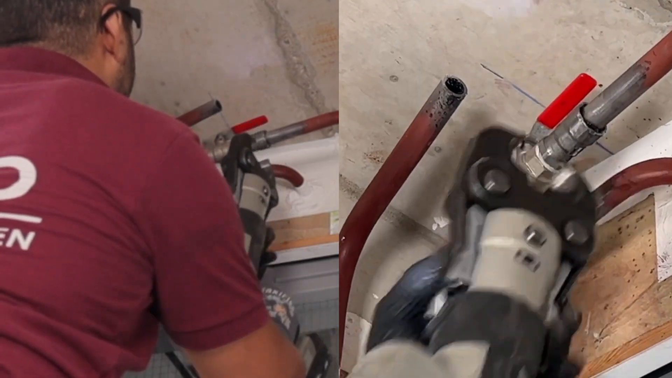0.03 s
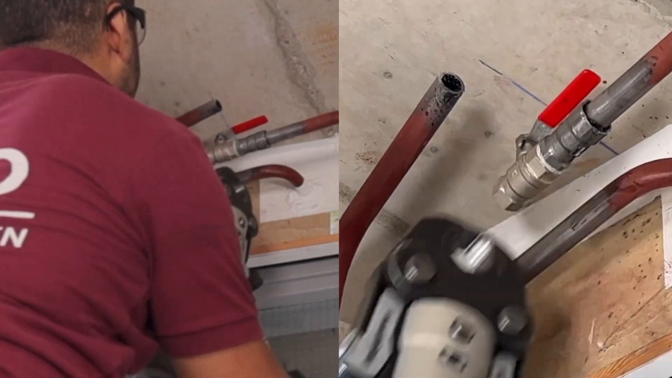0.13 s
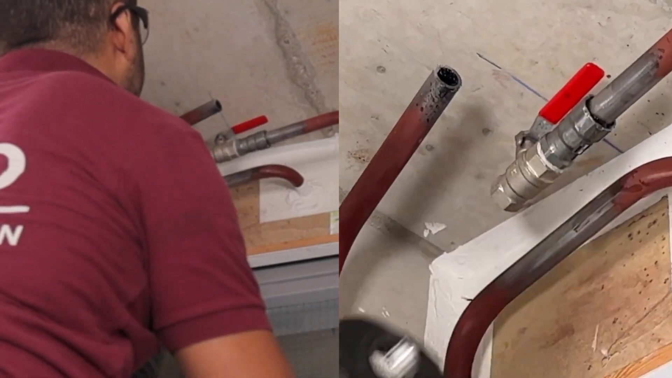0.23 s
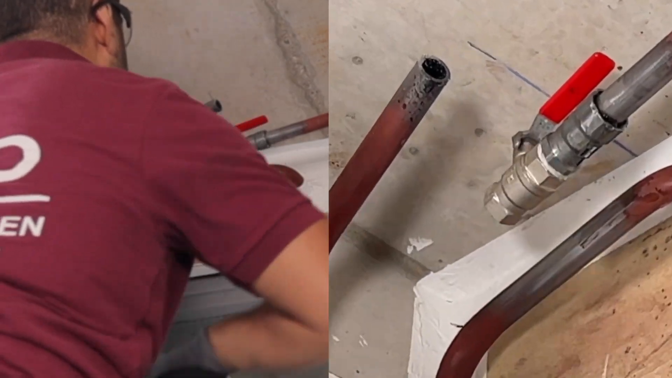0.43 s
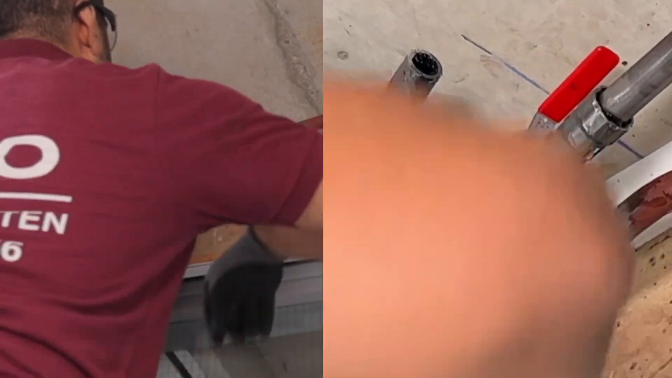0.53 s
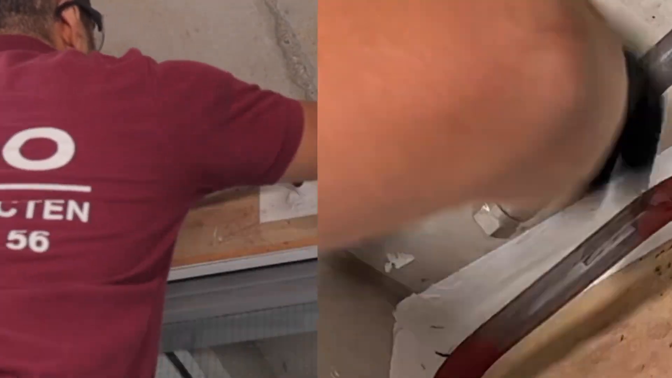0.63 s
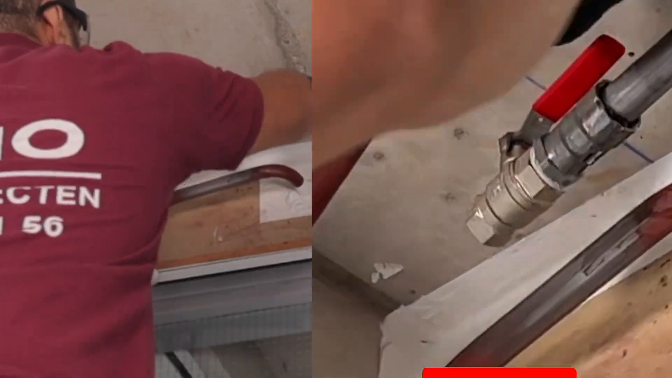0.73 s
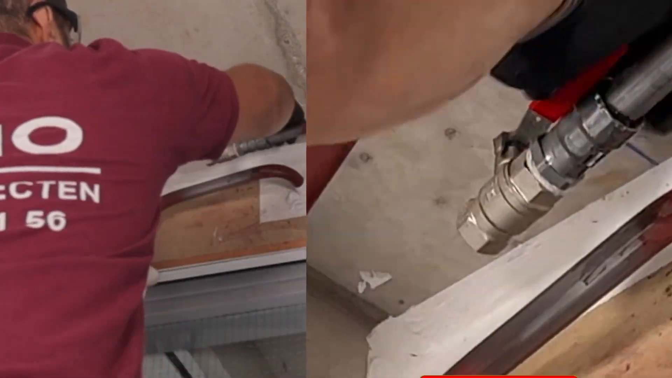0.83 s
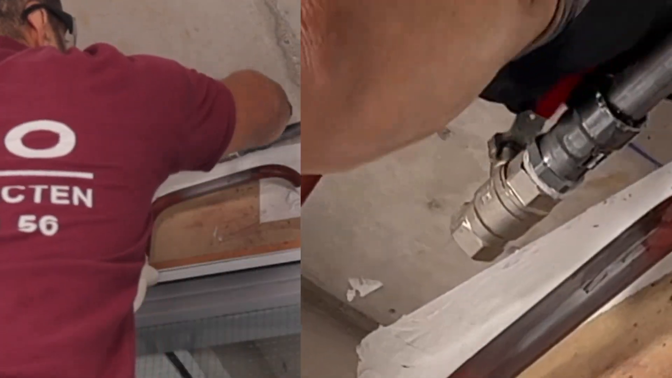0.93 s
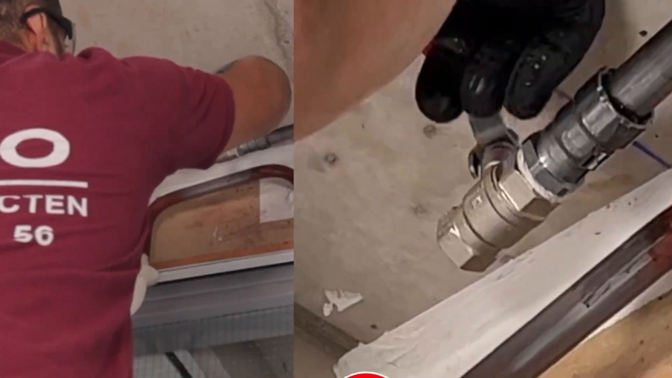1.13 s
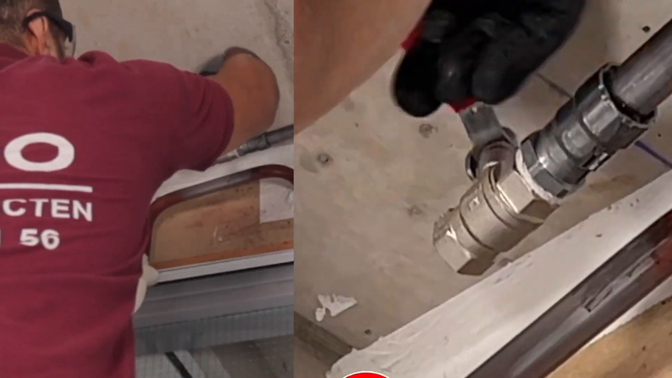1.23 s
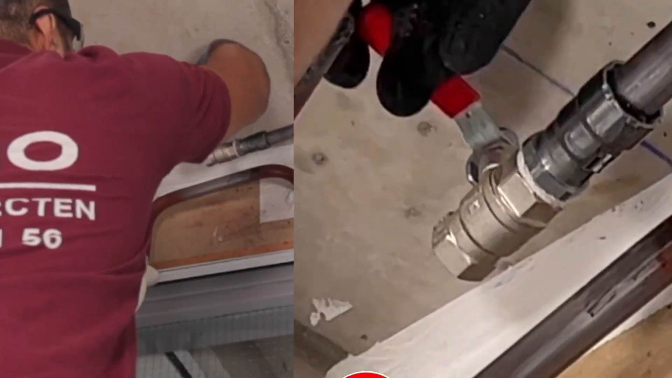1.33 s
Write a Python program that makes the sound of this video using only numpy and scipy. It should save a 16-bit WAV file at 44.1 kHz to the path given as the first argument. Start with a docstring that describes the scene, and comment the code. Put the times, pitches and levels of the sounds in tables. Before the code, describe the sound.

A press tool's steel jaws clack hard at about 0.2 seconds, bouncing rapidly until 0.25, with a bright ring and echo in a bare room. Before it, a wooden knock sounds at the very start over wavering low hum, hiss and a fading clatter. Faint wooden knocks follow at 0.42-0.58, then tiny rustles; from 1.12 to 1.4 a dull, soft rub close to the microphone.

```python
"""Over a wavering low hum, room hiss and the dying echo of an earlier clatter, wood is knocked at once.
The steel jaws of a press tool then clack and bounce as it is put down in a bare, echoing room:
decaying modes plus a noise crack. Faint knocks on wood and brushes of rustle, as filtered noise, follow.
Last, something soft rubs close to the microphone: random grains of friction noise in five bands."""
import sys
import numpy as np
from scipy import signal
from scipy.fft import rfft, irfft
from scipy.io import wavfile
from scipy.ndimage import uniform_filter1d

SR = 44100
rng = np.random.default_rng(int(sys.argv[2]) if len(sys.argv) > 2 else 0)


def invert_db(level):
    """Linear amplitude ratio for a level in decibels (20 dB per decade), elementwise."""
    return 10 ** (np.asarray(level, dtype=float) / 20)


def wav_record(signal):
    """Record a signal, one row per channel, as 16-bit PCM in the file named by sys.argv[1]."""
    frames = np.transpose(np.atleast_2d(signal))
    bounded = np.clip(frames, -1, 1)
    # unit amplitude maps onto the largest positive 16-bit level
    quanta = np.round(bounded * 32767).astype(np.int16)
    wavfile.write(sys.argv[1], SR, quanta)


N = 61740  # samples, 1.4 s


def colour(x, points):
    """Spectral shaping: gain is interpolated in dB over log frequency between (Hz, dB) points."""
    p = np.array(points, float)
    f = np.arange(len(x) // 2 + 1) * SR / len(x) + 1
    gain_db = np.interp(np.log(f), np.log(p[:, 0]), p[:, 1])
    return irfft(rfft(x) * invert_db(gain_db), len(x))


def unit(x):
    """Normalisation to an rms of 1."""
    return x / np.sqrt(np.mean(x ** 2))


def band(x, lo_hz, hi_hz):
    """Band-pass filtering, with the result at an rms of 1."""
    edges_hz = [lo_hz, min(hi_hz, 0.45 * SR)]
    sos = signal.butter(2, edges_hz, "band", fs=SR, output="sos")
    return unit(signal.sosfilt(sos, x))


def fade(t, t60):
    """Exponential decay: 60 dB in t60 seconds, from t = 0."""
    return 1000. ** (-np.maximum(t, 0) / t60)


def walk(rate):
    """Slow random modulation: levels 1 / rate seconds apart, joined by straight slopes; rms 1."""
    k = int(SR / rate)
    steps = np.repeat(rng.standard_normal(N // k + 1), k)
    return unit(uniform_filter1d(steps, k)[:N])


def follow(t, points):
    """Level envelope: amplitude along straight lines in dB between (s, dB) points."""
    p = np.array(points)
    return invert_db(np.interp(t, p[:, 0], p[:, 1]))


def add(out, s, x):
    """Superposition: mix x in from s seconds."""
    i = int(s * SR)
    out[i:i + len(x)] += x[:len(out) - i]


def background():
    """Shaped noise whose level rises and falls, as hum and hiss; a diffuse echo decays exponentially."""
    # hum level: (time [s], level [dB])
    hum_level = [(0.0, -43), (0.058, -47), (0.096, -53.5), (0.116, -41.5), (0.284, -56.5), (0.478, -58),
                 (0.494, -51), (0.522, -56.5), (0.942, -60.5), (0.966, -53.5), (1.162, -49.5), (1.184, -42),
                 (1.344, -49), (1.4, -42.5)]
    # hum spectrum: (frequency [Hz], level [dB])
    hum_colour = [(20, -15.5), (45, 0), (60, -9), (74, 9), (92, -12), (118, -7), (150, -20), (200, -46.5)]
    # room hiss level: (time [s], level [dB])
    hiss_level = [(0, -56.5), (.7, -58.5), (0.781, -58), (.93, -57.5), (1.0, -62.5), (1.1, -61), (1.4, -54)]
    # room hiss spectrum: (frequency [Hz], level [dB])
    hiss_colour = [(59, -29), (100, -2), (173, -5.5), (589, -8.5), (640, -13.5), (774, -12), (2090, -17),
                   (3180, -17), (12600, -33), (15500, -33)]
    # spectrum of the earlier clatter's echo: (frequency [Hz], level [dB])
    echo_colour = [(120, -40.5), (200, -6.5), (358, -4.5), (407, -8.5), (653, -10.5), (702, -5.5),
                   (1260, -13.5), (1880, -5.5), (2800, -9), (4260, -5.5), (5590, -9), (6130, 0),
                   (9310, -17), (13900, -18), (15500, -30.5)]
    echo_db, echo_t60_s = -33.5, 0.75

    t = np.arange(N) / SR
    hum = unit(colour(rng.standard_normal(N), hum_colour)) * follow(t, hum_level)
    hiss = unit(colour(rng.standard_normal(N), hiss_colour)) * follow(t, hiss_level)
    echo = unit(colour(rng.standard_normal(N), echo_colour)) * invert_db(echo_db) * fade(t, echo_t60_s)
    return hum + hiss + echo


def knocks():
    """Impact excitation: short pushes tick and ring a wooden board; longer contact is duller."""
    # modes of the board: (frequency [Hz], level [dB], decay time t60 [s])
    wood = [(435.7, -4, 0.054), (718, 0, .055), (1010, -8.5, 0.048), (1564, -10, 0.015), (2650, -12, 0.015),
            (4280, -12.5, .015)]
    # knocks: (time [s], level [dB], contact time [s])
    hits = [(.0003, -20.5, 0.00016), (0.189, -36, 0.00017), (.424, -40, 0.00071), (.44, -39.5, 0.00032),
            (.45, -46, 0.00035), (0.4629, -33, 0.000266), (.479, -37, .0005), (.5695, -31.5, 0.00011),
            (.5751, -34.5, 0.00046)]
    tick_db, tick_t60_s = -3.5, 0.023

    out, t = np.zeros(N), np.arange(SR // 5) / SR
    for s, db, contact in hits:
        detune = 1 + 0.01 * rng.standard_normal(len(wood))
        ring = np.zeros(len(t))
        for j, ((hz, mode_db, t60), k) in enumerate(zip(wood, detune)):
            # a mode faster than the contact is weakly driven
            drive = invert_db(mode_db) / (1 + (2 * np.pi * hz * contact) ** 2) ** 0.5
            ring += (-1) ** j * drive * np.sin(2 * np.pi * hz * k * t) * fade(t, t60)
        tick = band(rng.standard_normal(len(t)), 500, 0.5 / contact) * fade(t, tick_t60_s)
        add(out, s, invert_db(db) * (ring + invert_db(tick_db) * tick))
    return out


def jaws():
    """Modal synthesis: each clack cracks and rings the steel, heavily damped once its free time ends."""
    # modes of the jaws: (frequency [Hz], level [dB], decay time t60 [s], group)
    # group, cut to an integer, picks the clack's level: 0 body, 1 upper body, 2 mid ring, 3 or -1 high ring;
    # its square slows the swell, and above 1 the phase runs on from clack to clack
    steel = [(420, -11.5, .02, 3), (740, -6, 0.021, 0.5), (1430, -5, .03, -0.5), (1524, -3, .045, 0),
             (1720, -7, 0.07, 1.5), (2257, -8, 0.031, 1), (2475, -10.5, 0.015, 1), (3542, -6, .016, 1.5),
             (4470, -4, .02, -1), (5890, -2.5, 0.022, 3), (6570, 1.5, 0.033, 1), (6750, -3.5, 0.017, 1),
             (8175, 2, 0.18, 1.5), (8287, 0, .06, 2.5), (8700, -11.5, .06, 2.5), (13960, 3.5, 0.16, 3)]
    # clacks: (time [s], body [dB], upper body [dB], mid ring [dB], high ring [dB], free ringing time [s])
    clacks = [(0.2096, -6, -24.5, -10, -1, 0.0077), (0.2158, -17.5, -16.5, -27, -19.5, 0.01),
              (0.2299, -12.5, -13.5, -7.5, -19, 0.0059), (0.2346, -27.5, -20.5, -24.5, -25.5, 0.0059),
              (0.239, -20, -29, -13.5, -19, 0.0054), (0.2445, -21.5, -31.5, -19.5, -27.5, .004),
              (0.2487, -23.5, -30.5, -34, -29, .005)]
    # spectrum of the crack: (frequency [Hz], level [dB])
    crack_colour = [(100, -49.5), (200, -15.5), (600, -11.5), (1000, -5.5), (1500, -6.5), (3500, -5),
                    (6700, -12), (9000, -15), (14300, -19.5), (15800, -36)]
    crack_db, crack_t60_s = 8.5, 0.014  # level relative to the body
    seated_t60_s, swell_s = 0.008, 0.00022
    body_detune = 0.025  # each contact point shifts the phase-reset modes a little

    out, t = np.zeros(N), np.arange(SR // 5) / SR
    for s, *group_db, free in clacks:
        scatter = rng.standard_normal(len(steel))
        ring = np.zeros(len(t))
        for (hz, db, t60, g), c in zip(steel, scatter):
            mode_t = t + s if g > 1 else t * (1 + body_detune * c)
            swell = 1 - np.exp(-t / (swell_s * g ** 2 + 1e-5))
            level = invert_db(db + group_db[int(g)] + c)
            ring += level * np.sin(2 * np.pi * hz * mode_t) * fade(t, t60) * swell
        crack = unit(colour(rng.standard_normal(len(t)), crack_colour)) * fade(t, crack_t60_s)
        add(out, s, ring * fade(t - free, seated_t60_s) + invert_db(group_db[0] + crack_db) * crack)
    return out


def room(x):
    """Reverberation by convolution: quick near reflections and a diffuse tail decaying band by band."""
    # reverberation time: (frequency [Hz], t60 [s])
    tail_t60 = [(200, .45), (1000, 0.61), (3000, 0.87), (8000, 0.94), (11000, 0.7), (14000, 0.62)]
    # spectrum of the tail: (frequency [Hz], level [dB])
    tail_colour = [(100, -12), (600, -2), (1500, -2), (3500, 2), (7000, 1), (8200, 0), (11000, -1),
                   (14200, -5), (14500, -40)]
    tail_db, build_s = -20.5, 0.034
    early_db, early_t60_s = -15, 0.07  # reflections from the floor and nearby things

    t, r = np.arange(N) / SR, np.array(tail_t60)
    tail = np.zeros(N)
    for hz in 125 * 2. ** (np.arange(15) / 2):  # half-octave bands
        t60 = np.interp(np.log(hz), np.log(r[:, 0]), r[:, 1])
        noise = band(rng.standard_normal(N), hz / 2 ** 0.29, hz * 2 ** 0.21)
        tail += noise * hz ** 0.5 * fade(t, t60)  # the root evens out the density over frequency
    tail = colour(tail, tail_colour) * (1 - np.exp(-t / build_s))
    early = rng.standard_normal(N) * fade(t, early_t60_s)
    response = invert_db(tail_db) * unit(tail) + invert_db(early_db) * unit(early)
    return signal.fftconvolve(x, response / np.sqrt(N))[:N]


def brushes():
    """Amplitude-shaped noise: octave-wide puffs of rustle that swell and fade."""
    # faint brushes: (time [s], level [dB], time to the peak [s], centre frequency [Hz])
    puffs = [(.575, -60, 0.01, 8600), (0.762, -59.5, 0.023, 4930), (0.799, -67, 0.051, 10150),
             (0.888, -55, .007, 4370), (0.928, -62, 0.024, 1220), (1.17, -58, 0.0141, 12900)]

    t, out = np.arange(N) / SR, np.zeros(N)
    for s, db, rise, hz in puffs:
        age = np.maximum(t - s, 0) / rise
        rustle = band(rng.standard_normal(N), hz / 2 ** 0.5, hz * 2 ** 0.5)
        out += invert_db(db) * rustle * age * np.exp(1 - age)
    return out


def rub():
    """Friction noise: dense uneven grains thump through low resonances and swish in the bands above."""
    # rub: (time [s], then the level [dB] of each band of bands_hz in turn)
    strokes = [(1.116, -71, -75, -84, -71.5, -78), (1.136, -50, -49.5, -48, -54, -72),
               (1.156, -57, -49.5, -47.5, -55, -69.5), (1.19, -39.5, -50, -44, -56, -67),
               (1.235, -39.5, -41, -51, -58.5, -80), (1.274, -40, -45, -59, -66, -82),
               (1.324, -39, -50.5, -62, -63.5, -70), (1.348, -43, -51.5, -62.5, -60, -67.5),
               (1.4, -48.5, -60.5, -65.5, -66.5, -73.5)]
    # low resonances: (frequency [Hz], width [Hz], level [dB])
    resonances = [(120, 31, 0.5), (198, 24, 2.5), (258, 18, -0.5), (355, 50, -1), (470, 50, -3.5)]
    # bands: (lower edge [Hz], upper edge [Hz])
    bands_hz = [(150, 500), (500, 1200), (1200, 3000), (3000, 7500), (9500, 15000)]
    grains_per_s, grain_db, flutter_db = 2500, 2, 1.2

    t, c = np.arange(N) / SR, np.array(strokes)
    struck = rng.random(N) < grains_per_s / SR
    grains = 0.8 + struck * invert_db(grain_db * rng.exponential(size=N))
    layers = [band(grains * rng.standard_normal(N), lo, hi) for lo, hi in bands_hz]
    friction = grains * rng.standard_normal(N)
    thump = sum(invert_db(db) * band(friction, hz - w / 2, hz + w / 2) for hz, w, db in resonances)
    layers[0] = unit(thump + 0.5 * layers[0])
    out = np.zeros(N)
    for k, layer in enumerate(layers):
        stroke_db = np.interp(t, c[:, 0], c[:, k + 1], left=-99)
        out += layer * invert_db(stroke_db + flutter_db * walk(60))
    return out


def scene():
    """Superposition at one microphone: direct sound, reverberation of the hits, and background."""
    # the hits are thin below 280 Hz
    high_pass = signal.butter(2, 280, "high", fs=SR, output="sos")
    hits = signal.sosfilt(high_pass, jaws() + knocks())
    mono = hits + room(hits) + brushes() + rub() + background()
    return np.array([mono, mono])


def band_limit(x):
    """A steep low-pass at the top of the band."""
    return signal.sosfilt(signal.butter(12, 15900, fs=SR, output="sos"), x)


def record(dry):
    """Band limiting and soft saturation: the top is cut and the loudest peaks are rounded."""
    top_hz, ceiling = 15300, 0.95  # ceiling as a share of full scale
    dull = signal.sosfilt(signal.butter(8, top_hz, fs=SR, output="sos"), dry)
    mix = ceiling * np.tanh(dull / ceiling)
    return band_limit(mix)


dry = scene()
out = record(dry)
wav_record(out)
```